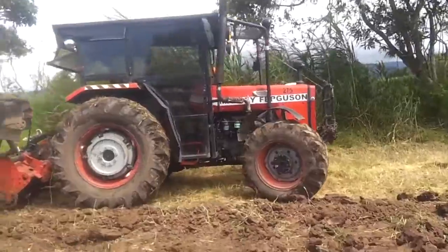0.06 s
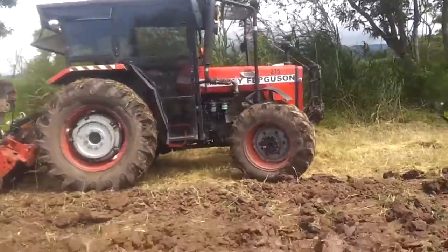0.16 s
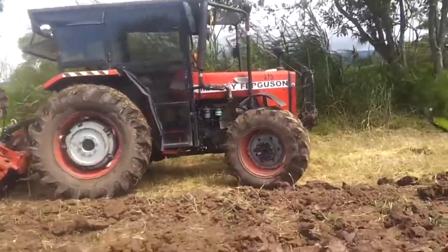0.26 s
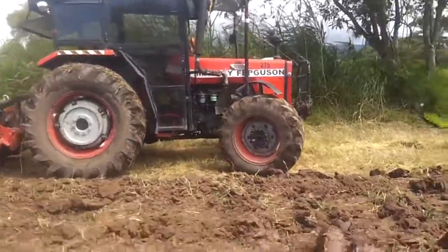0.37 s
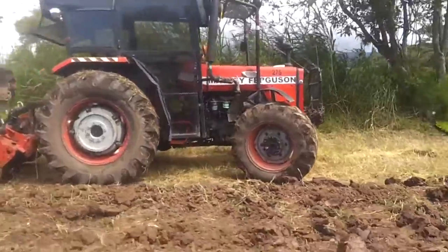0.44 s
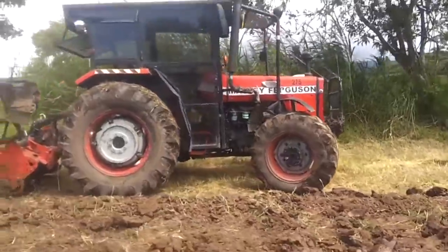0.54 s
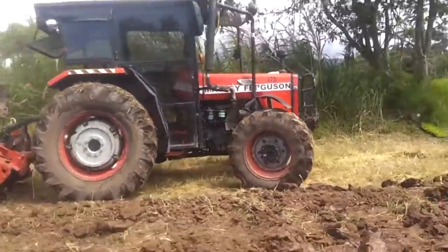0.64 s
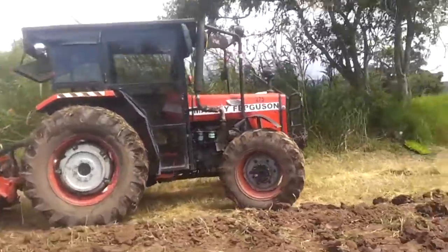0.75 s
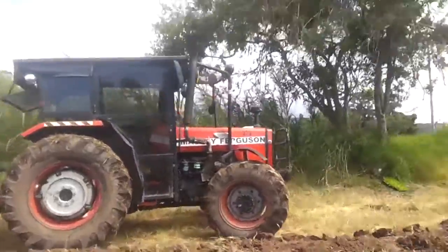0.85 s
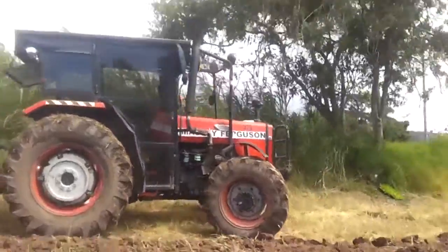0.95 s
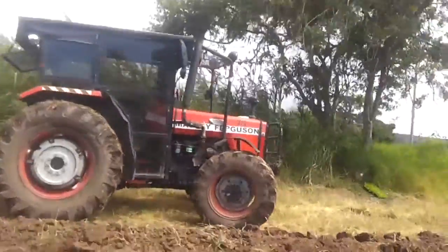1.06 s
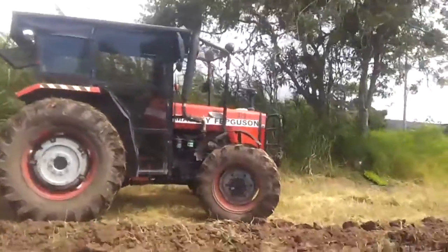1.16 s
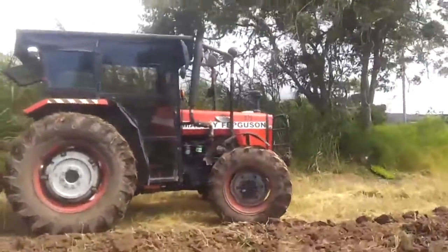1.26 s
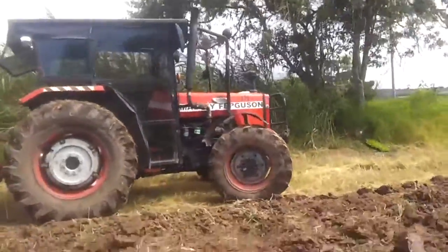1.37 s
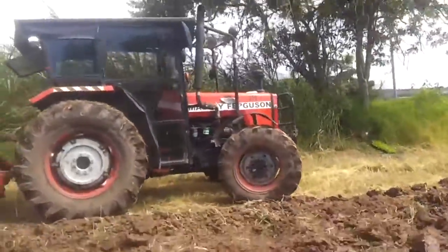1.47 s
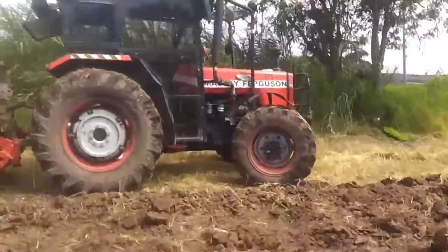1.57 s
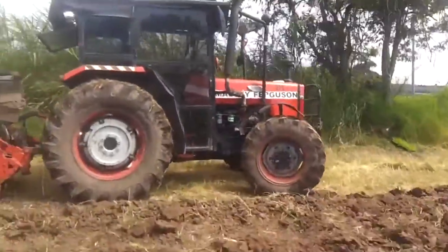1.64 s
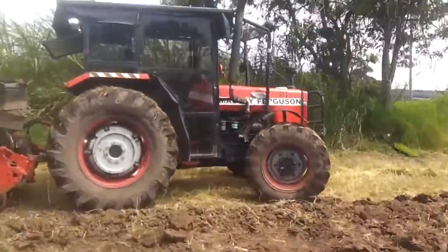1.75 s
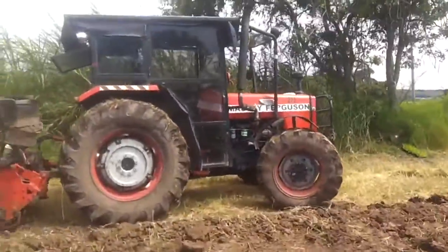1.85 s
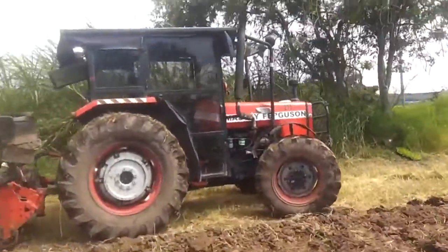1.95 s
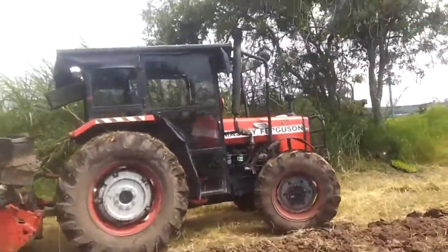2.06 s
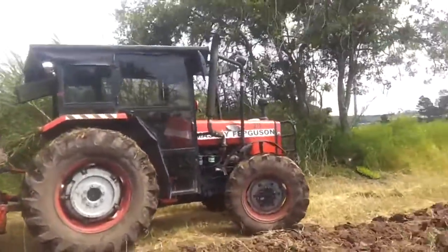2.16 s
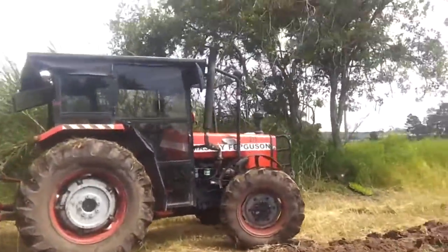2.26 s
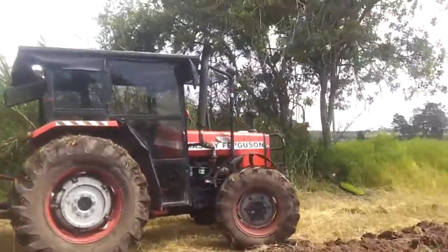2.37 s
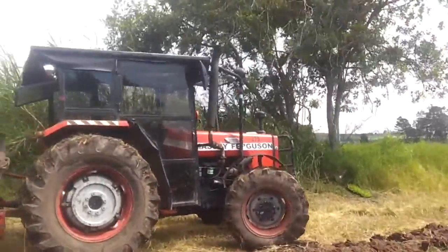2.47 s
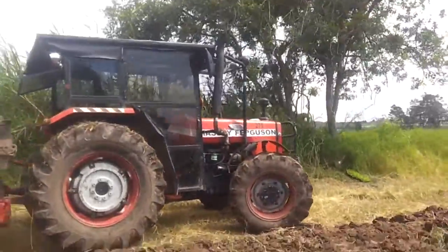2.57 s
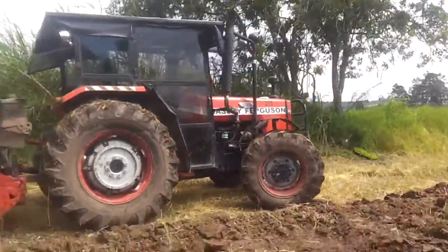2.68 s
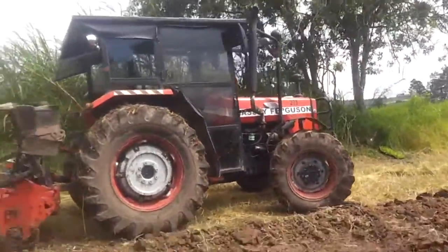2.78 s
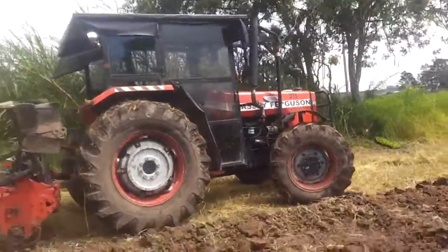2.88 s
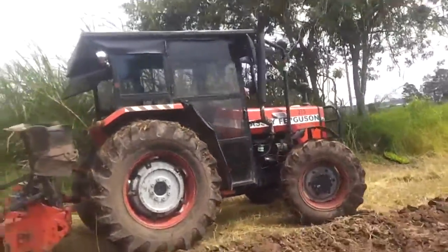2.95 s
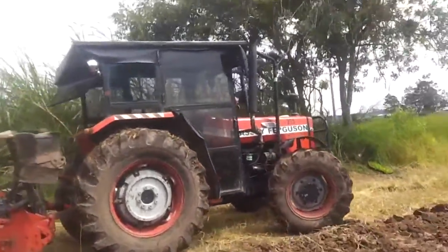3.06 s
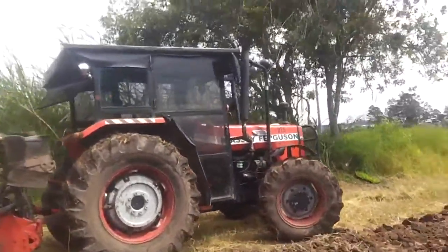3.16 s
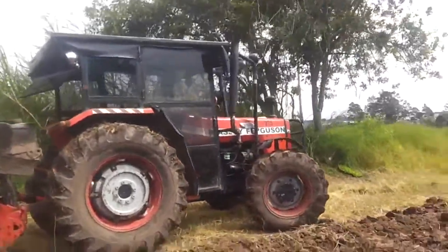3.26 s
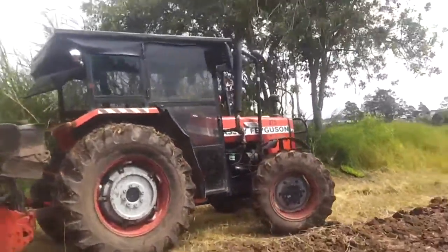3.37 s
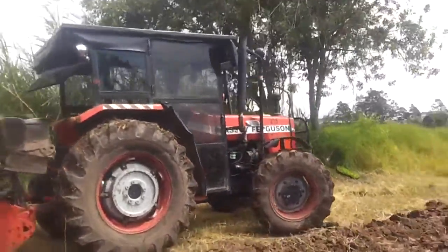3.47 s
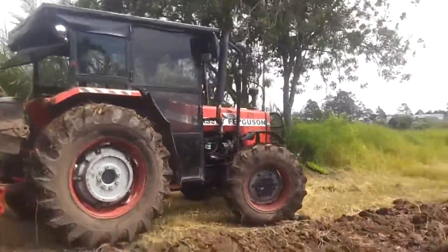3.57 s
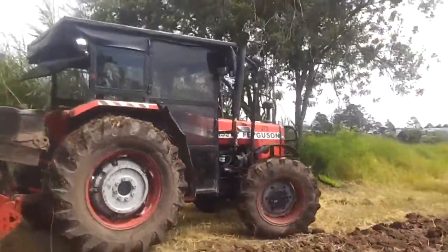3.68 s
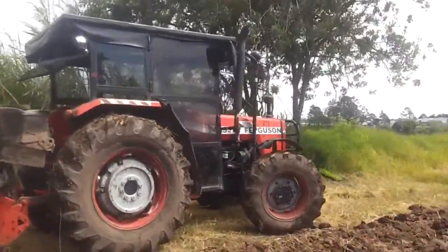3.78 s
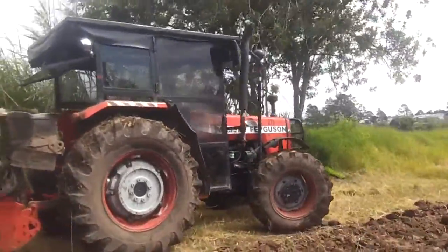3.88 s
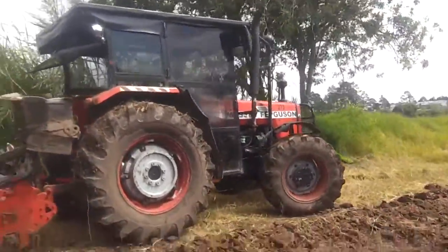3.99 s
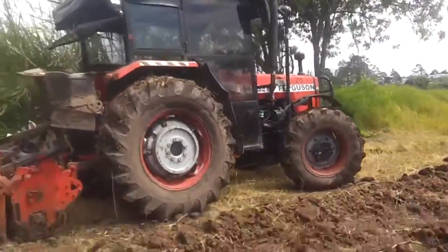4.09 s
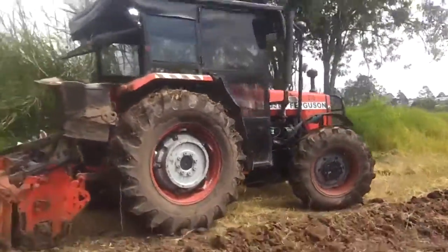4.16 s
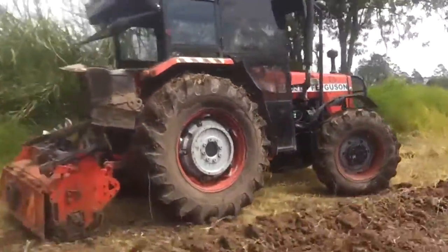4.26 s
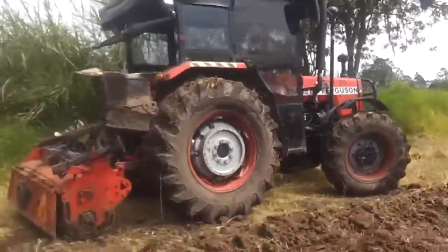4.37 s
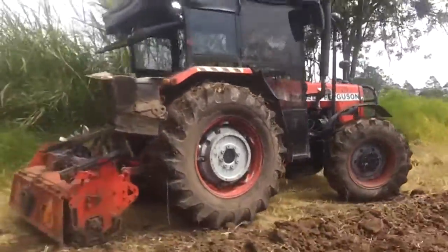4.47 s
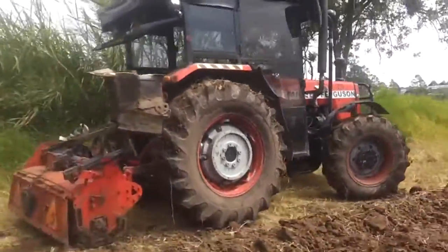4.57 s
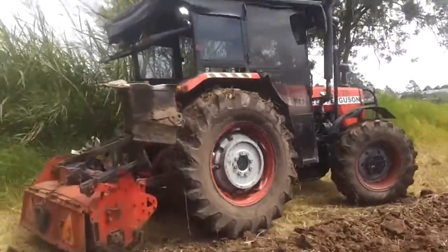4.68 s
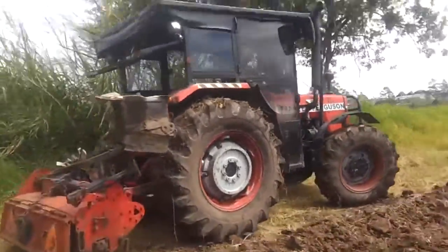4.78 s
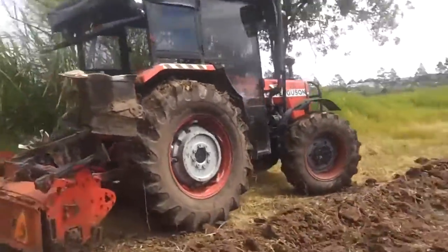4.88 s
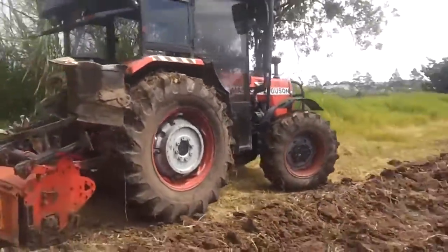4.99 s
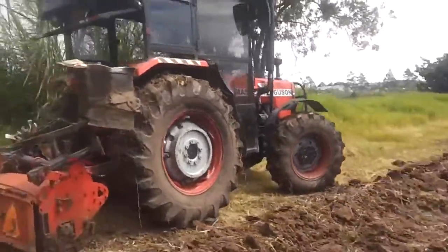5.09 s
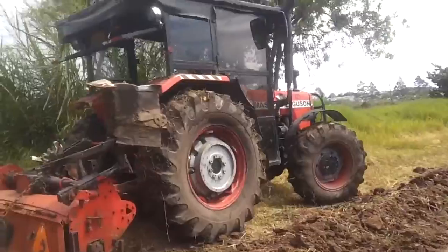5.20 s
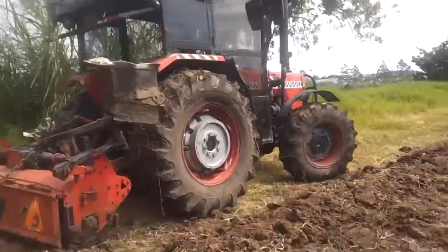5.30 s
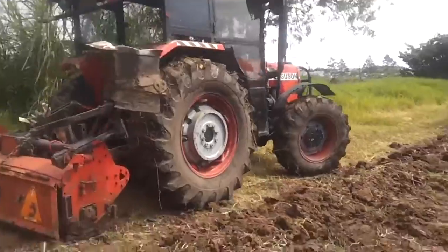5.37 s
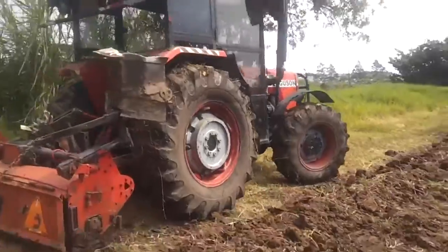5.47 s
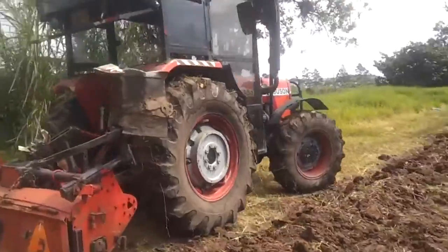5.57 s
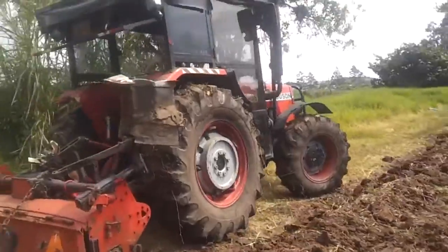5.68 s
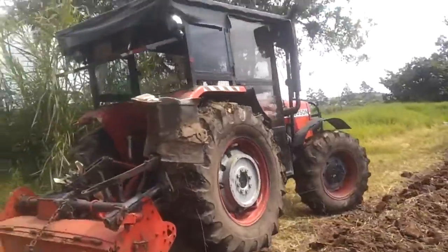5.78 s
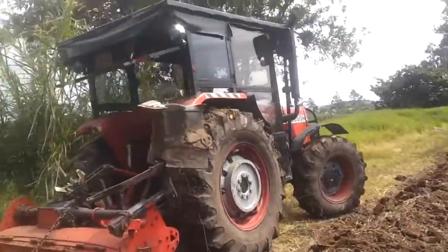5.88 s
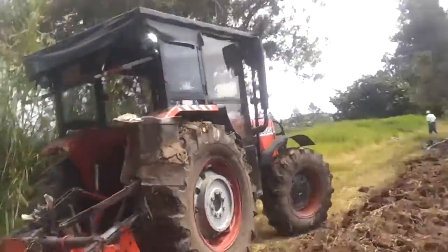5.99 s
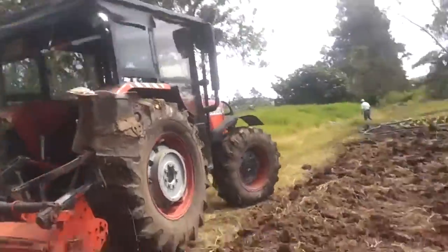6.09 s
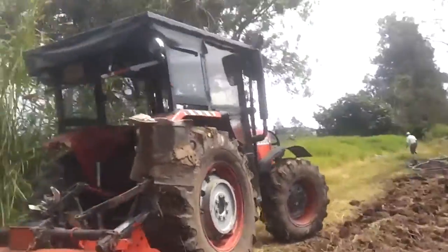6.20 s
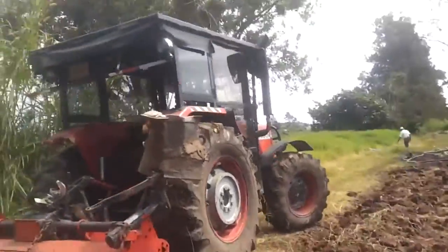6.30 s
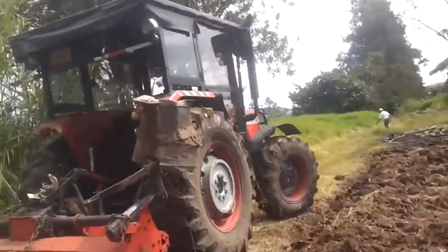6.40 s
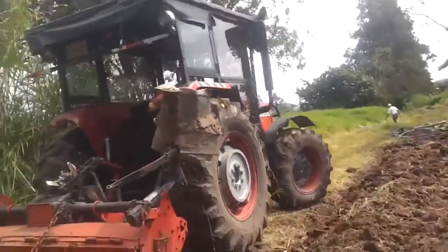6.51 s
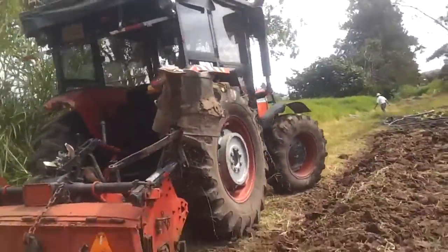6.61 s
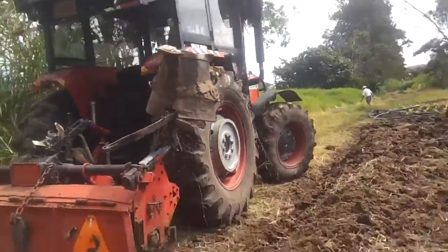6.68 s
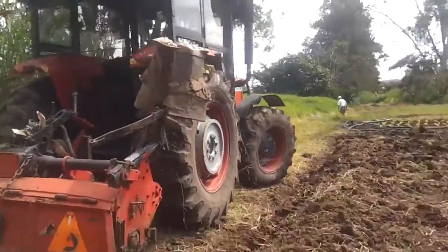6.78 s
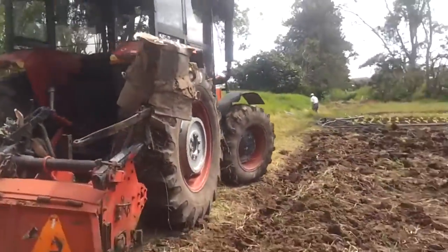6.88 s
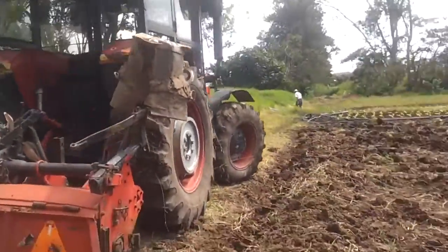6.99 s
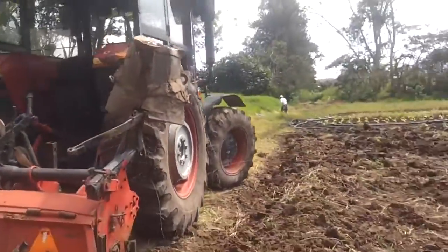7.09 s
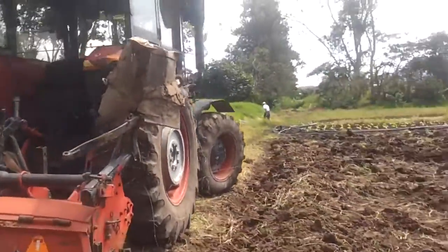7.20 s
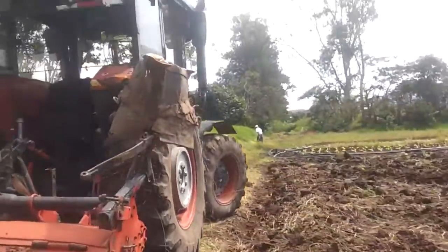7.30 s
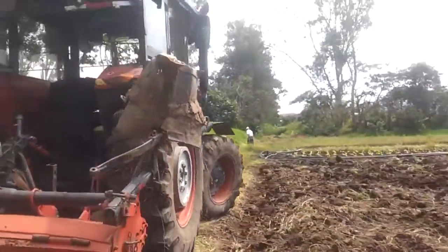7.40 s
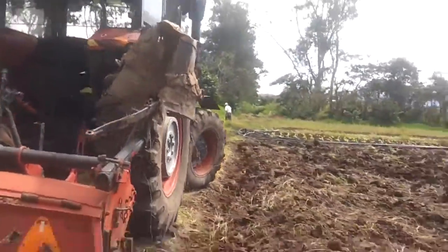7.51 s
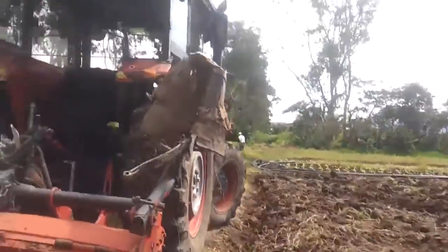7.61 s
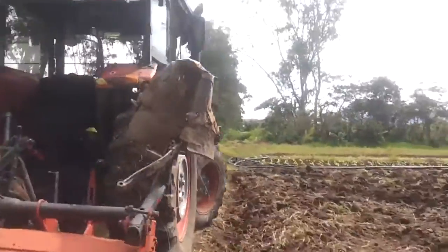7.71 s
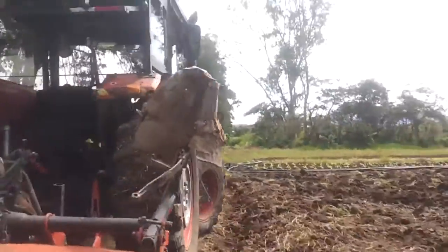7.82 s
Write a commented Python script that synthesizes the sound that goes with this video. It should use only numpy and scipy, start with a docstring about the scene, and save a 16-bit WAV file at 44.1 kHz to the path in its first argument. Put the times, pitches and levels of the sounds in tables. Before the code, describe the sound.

A diesel tractor chugs steadily past, first half buried under crackling wind buffets on the left, later clear, clattering and metallic from behind.

```python
"""Gusts first buffet the two microphone ports of a hand-held phone separately, the left one hardest, and
overload the input; each port sums shaped noise and short pressure swings. Throughout, a diesel tractor chugs
slowly past at about nineteen firings a second, dragging a rotary tiller: noise pulsed by the firing cycle
excites block, sheet metal and exhaust, and fan and soil hiss. As the gusts die away the tractor is heard
more from behind, and a tinny panel there, ringing on every second firing, comes forward."""
import sys
import numpy as np
from scipy import signal
from scipy.fft import rfft, irfft, next_fast_len
from scipy.io import wavfile
from scipy.ndimage import uniform_filter1d, map_coordinates

SR = 44100
rng = np.random.default_rng(int(sys.argv[2]) if len(sys.argv) > 2 else 0)


def field_ratio(decibels):
    """Amplitude ratio for a level in dB (20 dB per decade); scalars and array-likes work."""
    return 10 ** (np.asarray(decibels, dtype=float) / 20)


def wrap_up_sound(samples):
    """Save the sound to the file named by the first command line argument, as 16-bit audio."""
    columns = np.atleast_2d(samples).T
    # keep every value between -1 and 1, then stretch to whole-number steps
    tamed = np.clip(columns, -1, 1)
    steps = np.round(tamed * 32767).astype(np.int16)
    wavfile.write(sys.argv[1], SR, steps)


N = 346185  # length in samples

# Spectrum levels are relative: each coloured noise is later scaled to rms 1.
# level difference of the ports: f/Hz, left over right level/dB
PORT_BALANCE = [(300, -0.5), (500, 2), (750, 0.5), (1050, -6.5), (1300, -10), (1650, -4), (2000, 7),
                (2600, -4.5), (6000, 1.5), (9200, -4), (14000, -16.5)]
# likeness of the two ports: f/Hz, likeness [0-1]
PORT_LIKENESS = [(60, .8), (300, .95), (620, .8), (1100, .55), (2000, .62), (3000, .62), (6400, .3),
                 (12000, .05)]
# phase shift by the port cavities: f/Hz, left leads by [rad]
PORT_LEAD = [(400, 0.18), (900, -1.57), (1400, -1.58), (2000, -0.8), (4000, -0.49)]

# breeze: t/s, left port level/dB, right port level/dB
BREEZE_LEVEL = [(0, -14.5, -46), (.4, -22, -28), (1.8, -25.5, -34), (2.2, -27, -27.5), (3.2, -22, -38),
                (3.45, -33, -37.5), (4.6, -30.5, -31.5), (5.2, -45.5, -47), (7.85, -78, -85)]
# gusts, added to the breeze as power: t/s at the height, port [0 left, 1 right], level/dB, half length [s]
GUST_EVENTS = [(0.124, 0, -10.5, 0.045), (0.343, 0, -9.5, 0.072), (0.535, 0, -11, 0.068),
               (0.798, 0, -19, 0.06), (0.985, 0, -21, 0.015), (1.13, 0, -33, 0.026), (1.238, 0, -2, 0.11),
               (1.567, 0, -15, 0.093), (1.68, 0, -14.5, 0.087), (1.953, 0, -26.5, 0.054),
               (2.325, 0, -18.5, 0.062), (2.55, 0, -15, 0.12), (2.876, 0, -17.5, 0.085),
               (3.043, 0, -32, 0.046), (3.2, 0, -20.5, 0.12), (3.564, 0, -15.5, 0.025),
               (3.702, 0, -15.5, 0.1), (3.906, 0, -12, 0.04), (4.07, 0, -19, 0.017), (4.196, 0, -23, 0.047),
               (4.342, 0, -23.5, 0.054), (4.55, 0, -29.5, 0.044), (4.812, 0, -26.5, 0.048),
               (4.996, 0, -30, 0.054), (.14, 1, -31, .04), (.45, 1, -17, 0.043), (0.637, 1, -14.5, 0.037),
               (0.75, 1, -17, 0.044), (.91, 1, -25, 0.036), (1.1, 1, -35, 0.036), (1.333, 1, -18, 0.083),
               (1.62, 1, -29, 0.031), (2.175, 1, -33, 0.077), (2.68, 1, -24, 0.15), (3.21, 1, -27, .05),
               (3.56, 1, -29, 0.073), (3.856, 1, -23, 0.12), (3.993, 1, -30, 0.059), (4.233, 1, -17, 0.05),
               (4.512, 1, -26, 0.025)]
# strongest eddies: t/s, port [0 left, 1 right], peak level/dB before tearing, f/Hz, length [cycles]
STRONG_EDDIES = [(0.02, 0, 0, 434, 0.37), (0.106, 0, 2, 490, 2), (0.12, 0, 7.5, 730, 0.45),
                 (0.127, 0, 3, 450, .5), (0.168, 0, -9, 400, 0.76), (0.179, 0, -9, 350, .4),
                 (0.205, 0, -9, 377, 0.63), (0.271, 0, -4, 410, 0.26), (0.301, 0, 4, 279, 0.3),
                 (0.324, 0, -4.5, 520, 0.18), (0.344, 0, 7, 350, 0.4), (0.362, 0, -5, 485, 0.31),
                 (0.381, 0, 3, 505, 0.17), (0.425, 0, -6, 450, 0.41), (0.44, 1, -8, 351, 0.54),
                 (0.462, 1, -12, 350, 0.81), (0.5, 0, -13, 476, 0.68), (0.514, 0, -7.5, 352, 0.75),
                 (0.547, 0, 5.5, 480, 0.76), (0.606, 0, -1, 380, 1.4), (0.615, 0, 5, 350, 0.28),
                 (0.652, 1, -11, 395, 0.71), (0.713, 0, -4.5, 377, 0.46), (0.727, 0, -7, 390, 1.5),
                 (0.749, 1, -8, 298, 0.45), (0.812, 0, -14, 380, .4), (0.832, 0, -8, 394, 0.76),
                 (1.118, 0, -7.5, 340, 1.1), (1.142, 0, 0, 374, 1.7), (1.167, 0, -12, 420, 0.45),
                 (1.191, 0, 14, 527, 0.94), (1.199, 0, 4.5, 332, 1.8), (1.2, 0, -16, 70, .5),
                 (1.228, 0, 2, 450, 0.62), (1.238, 0, 0, 420, 0.99), (1.253, 0, 14.5, 563, 1.65),
                 (1.273, 0, -1, 440, 0.55), (1.316, 0, 5, 890, 0.25), (1.326, 0, 10.5, 1190, 0.38),
                 (1.353, 0, 0.5, 396, 0.72), (1.404, 0, -0.5, 326, 0.58), (1.455, 0, 5, 252, 0.24),
                 (1.477, 0, 0, 580, 0.89), (1.492, 0, -2, 480, 0.3), (1.561, 0, -4.5, 430, 1.4),
                 (1.653, 0, 4.5, 426, 0.35), (1.666, 0, -5, 520, .4), (1.694, 0, -8.5, 350, 0.61),
                 (1.732, 0, -6.5, 384, 0.51), (1.77, 0, -11, 300, 0.83), (1.933, 1, -7.5, 342, 0.36),
                 (2.357, 0, -12, 345, 0.67), (2.41, 0, -10, 346, 0.78), (2.431, 0, -8, 286, 0.43),
                 (2.527, 0, -7, 480, 0.41), (2.573, 0, -4.5, 480, 0.44), (2.606, 0, -9, 520, .3),
                 (2.649, 0, -9, 327, 0.35), (2.71, 0, -12.5, 328, 0.4), (2.729, 0, -4.5, 435, 0.41),
                 (2.84, 0, -14, 348, 0.44), (2.87, 0, -4, 300, 0.47), (2.902, 0, -5.5, 414, 0.58),
                 (2.991, 0, -9.5, 294, 1.2), (3.025, 0, -8, 325, 0.38), (3.059, 0, -5.5, 280, 0.4),
                 (3.256, 0, -8, 313, 0.66), (3.428, 1, -4.5, 382, 0.52), (3.564, 0, -11.5, 378, 0.98),
                 (3.641, 0, -7.5, 400, 0.27), (3.669, 0, -11, 350, .3), (3.696, 0, -7.5, 360, 0.4),
                 (3.724, 1, -10, 320, 0.41), (3.736, 0, -10, 300, 0.44), (3.756, 0, -15, 380, .3),
                 (3.809, 0, -5, 424, 0.36), (3.906, 1, -10, 385, 0.48), (3.922, 0, 5, 490, 0.26),
                 (4.194, 0, -5, 330, 0.41), (4.224, 1, -1.5, 290, 0.99), (4.274, 1, -8.5, 347, 0.36),
                 (4.357, 1, -13.5, 298, .8), (4.496, 1, -10.5, 237, 0.58), (4.889, 0, -0.5, 457, 0.38)]
# spectrum of the buffeting: f/Hz, level/dB per Hz
BUFFET_SPECTRUM = [(15, -78), (40, -54), (100, -4), (200, 4.5), (300, 2.5), (450, -15), (700, -24.5),
                   (1500, -36), (4000, -84)]
# spectrum of big slow eddies: f/Hz, level/dB per Hz
THUD_SPECTRUM = [(15, -28), (40, -29), (90, 18), (160, 8), (300, -54)]
# spectrum of fine turbulence: f/Hz, level/dB per Hz
RASP_SPECTRUM = [(250, 6), (550, 16.5), (1000, 6), (2000, -6), (4000, -30.5)]

# running of the engine: t/s, firings so far
FIRING_COUNT = [(0.0, -0.13), (4.0, 74.93), (5.8, 108.62), (7.0, 131.02), (7.85, 147.11)]
# the tractor creeps past: t/s, engine level/dB, seen from behind [0-1], left port hears later by [ms]
PASSAGE = [(0, -42.5, 0.3, 0.03), (.25, -36, 0.22, 0.027), (.65, -40, 0.2, -0.0011), (.8, -36, 0.45, 0.023),
           (1.07, -36, 0.33, 0.03), (1.65, -38, 0.4, 0.0068), (1.95, -36, 0.5, -0.048),
           (2.2, -38.5, 0.3, 0.00047), (2.4, -36, 0.4, 0.009), (3.3, -36.5, 0.67, -0.0056),
           (3.72, -37.5, 0.2, 0.025), (3.95, -36, 0.3, -0.059), (4.7, -38, 1, -0.091),
           (4.87, -40.5, 0.5, -0.078), (5.23, -36.5, 1, -0.046), (5.5, -38.5, 0.9, -0.079),
           (6.4, -38.5, 0.85, 0.034), (7.2, -38, 1, 0.016), (7.85, -37.5, 0.77, 0.053)]
# how much the tinny rear panel faces the phone: t/s, level/dB over the engine level
PANEL_FACING = [(0, -16), (4.3, -16), (4.6, -11), (5.3, -7), (6.2, -8), (6.8, -12), (7.15, -2), (7.85, -2)]
# resonances of block and sheet metal: f/Hz, width [Hz], level/dB over the rest from the side, and from behind
METAL_MODES = [(1033, 37, 4.5, 5), (1463, 16, -3, 9), (1660, 26, -15, 5), (2140, 170, 6.5, -1.5),
               (2866, 41, 7.5, 3), (4300, 47, -21, 7.5)]
# spectrum of the valve gear: f/Hz, level/dB per Hz
CLATTER_SPECTRUM = [(1200, -1), (2200, -8), (3200, 1), (5000, 2.5), (7000, 1.5), (9000, -3), (11000, -24),
                    (14400, -49)]
# spectrum of the shaken block: f/Hz, level/dB per Hz
KNOCK_SPECTRUM = [(400, -7), (620, -2.5), (800, 3), (1300, -2), (2000, 1), (2600, -5), (4500, -22)]
# spectrum of the exhaust: f/Hz, level/dB per Hz
EXHAUST_SPECTRUM = [(20, -70), (40, -45), (75, -16), (130, -15), (250, -4.5), (300, -2), (355, 1),
                    (420, -3.5), (500, -9.5), (620, -6), (1000, -54)]
# spectrum of fan and thrown soil: f/Hz, level/dB per Hz
HISS_SPECTRUM = [(2000, 7), (4000, 6), (8000, 7), (10500, 5.5), (12500, -7.5), (14400, -18)]
# spectrum of the tinny rear panel: f/Hz, level/dB per Hz
TINNY_SPECTRUM = [(600, -40), (950, -14), (1020, 2), (1100, 2), (1180, -14), (1700, -26), (3800, -44),
                  (4280, -28), (4800, -44)]


def unit(x):
    """Normalisation to an rms of 1."""
    return x / np.sqrt(np.mean(x ** 2) + 1e-20)


def along(points, hz):
    """Linear interpolation of (f/Hz, value) points on a logarithmic frequency axis."""
    f, value = np.transpose(points)
    return np.interp(np.log(hz + 1), np.log(f + 1), value)


def curves(rows):
    """Linear interpolation in time: one curve for each column after t/s."""
    s, *columns = np.transpose(rows)
    return np.array([np.interp(np.arange(N) / SR, s, column) for column in columns])


def wobble(rate):
    """Slow random fluctuation: a spline through independent normal knots, rate knots a second."""
    knots = rng.standard_normal(int(N * rate / SR) + 4)
    return map_coordinates(knots, [np.arange(N) * rate / SR])


def filtered(x, response):
    """Linear filtering: the spectrum of x times a response of f/Hz."""
    m = next_fast_len(N + 8192)
    return irfft(rfft(x, m) * response(np.fft.rfftfreq(m, 1 / SR)), m)[..., :N]


def patchy(patchy_db):
    """Modulated noise: two independent noises share random gain patches in time and frequency."""
    z = signal.stft(rng.standard_normal((2, N)), nperseg=512)[2]
    field = rng.standard_normal(z.shape[1:])
    field = uniform_filter1d(field, size=5, axis=0)  # across frequency
    field = uniform_filter1d(field, size=6, axis=1)  # along time, about 35 ms
    return signal.istft(z * field_ratio(patchy_db * unit(field)), nperseg=512)[1][:, :N]


def at_ports(pair, spectrum):
    """Partial coherence: two coloured signals mix as mid and side into both ports, rms 1."""
    def colour(hz):
        turn = np.arccos(np.clip(along(PORT_LIKENESS, hz), 0, 1)) / 2
        return field_ratio(along(spectrum, hz)) * [np.cos(turn), np.sin(turn)]

    def port_response(hz):
        left_over_right = field_ratio(along(PORT_BALANCE, hz)) * np.exp(1j * along(PORT_LEAD, hz))
        return left_over_right ** [[.5], [-.5]]

    mid, side = filtered(pair, colour)
    return unit(filtered(np.array([mid + side, mid - side]), port_response))


def airflow(port):
    """Superposition of powers: the breeze plus bell-shaped gusts at one port, as a level in dB."""
    t = np.arange(N) / SR
    power = field_ratio(2 * curves(BREEZE_LEVEL)[port])
    for s, at, db, half in GUST_EVENTS:
        if round(at) == port:
            near = slice(max(int((s - 4 * half) * SR), 0), int((s + 4 * half) * SR))
            power[near] += field_ratio(2 * db) * np.exp(-2 * ((t[near] - s) / half) ** 2)
    return 10 * np.log10(power)


def eddies(s, db, hz, cycles):
    """Vortex pressure: short swings under a Gaussian envelope, mostly pushing inward, centred at s."""
    t = np.arange(-400, 400) / SR
    turns = hz[:, None] * t
    shift, glide = rng.random((2, len(s), 1)) - .5
    phase = turns + 0.43 * shift + 0.15 * glide * turns ** 2  # in cycles
    envelope = np.exp(-(turns / np.reshape(cycles, (-1, 1))) ** 2)
    swing = np.cos(2 * np.pi * phase) * envelope
    at = np.clip(np.round(s[:, None] * SR) + np.round(t * SR), 0, N).astype(int)
    return np.bincount(at.ravel(), (field_ratio(db)[:, None] * swing).ravel(), N + 1)[:N]


def rush(spectrum, lumps_db):
    """Turbulent noise: lumps of white noise coloured by a spectrum, rms 1."""
    lumpy = field_ratio(lumps_db) * rng.standard_normal(N)
    return unit(filtered(lumpy, lambda hz: field_ratio(along(spectrum, hz))))


def wind_at(port):
    """Turbulent pressure at one port: stronger flow raises the pitch of its eddies and adds a rasp."""
    level_db = airflow(port)
    flutter = wobble(70)
    buffet = rush(BUFFET_SPECTRUM, 3.3 * wobble(25) + 3.7 * flutter)

    # deep thudding over the flow hardly follows the strongest gusts
    thud_db = (-11, -26)[port] - 0.6 * np.maximum(level_db + 33.5, 0)
    thud = field_ratio(thud_db) * rush(THUD_SPECTRUM, 3 * wobble(17))
    rasp = field_ratio(1.05 * (level_db + 17.5)) * rush(RASP_SPECTRUM, 5 * wobble(45) + 5 * flutter)

    # a swarm of a thousand random eddies, few of them large
    when, size, pitch = rng.random((1000, 3)).T
    s = when * N / SR
    flow_db = level_db[(s * SR).astype(int)]
    hz = 270 * field_ratio(0.16 * (flow_db + 19) + 7 * (pitch - .5))
    swarm = unit(eddies(s, -3.5 * np.log(size + .05), hz, cycles=.48))

    flow = .6 * buffet + thud + .12 * rasp + .7 * swarm
    table = np.array(STRONG_EDDIES)
    s, _, db, hz, cycles = table[np.round(table[:, 1]) == port].T
    torn = 1 + 0.32 * rush(RASP_SPECTRUM, 3 * flutter)  # by finer turbulence
    return field_ratio(level_db) * flow + eddies(s, db, hz, cycles) * torn


def wind():
    """Local flow noise: the turbulence at each port is independent of the other."""
    return np.array([wind_at(port) for port in (0, 1)])


def beat(lead, rise, fall, scatter_db, between_db, every=1):
    """Periodic excitation: quick rise, slower fall [in cycles], random strength, over a steady floor."""
    count = (curves(FIRING_COUNT)[0] + lead + 1) / every
    part = count % 1
    size = field_ratio(scatter_db * rng.standard_normal(int(count.max()) + 1))[count.astype(int)]
    burst = (1 - np.exp(-part / rise)) * np.exp(-(part / fall) ** 2)
    return size * burst + field_ratio(between_db)


def fan_and_soil():
    """Broadband flow noise: fan and tiller hiss, nearly steady over the firing cycle."""
    pulse = beat(lead=0.95, rise=0.021, fall=0.3, scatter_db=15.0, between_db=32.0)
    return at_ports(pulse * patchy(patchy_db=2.5), HISS_SPECTRUM)


def exhaust_puffs():
    """Pulsed outflow: one steady puff per firing, as a train of impulses, with the running count."""
    count = curves(FIRING_COUNT)[0] + 0.2163
    return unit(np.diff(np.floor(count), prepend=np.floor(count[0]))), count


def exhaust_pipe(puffs):
    """Pulsed outflow with turbulence: puffs and pulsing gas noise share one spectrum."""
    pulse = beat(lead=.27, rise=.04, fall=.35, scatter_db=2, between_db=-3)
    gas = unit(pulse * patchy(patchy_db=2.1))
    return at_ports(gas + [[.45], [0]] * puffs, EXHAUST_SPECTRUM)


def tinny_panel(puffs, count):
    """Forced vibration: a rear panel rings on every second firing, as rattle and sharp strikes."""
    pulse = beat(lead=1.36, rise=.04, fall=.22, scatter_db=1, between_db=-20, every=2)
    rattle = unit(pulse * patchy(patchy_db=1))
    second = puffs * (np.floor(count) % 2 == 0)
    strikes = unit(np.roll(second, round(.008 * SR)))  # the ring peaks a little after the firing
    return at_ports(rattle + [[.8], [.4]] * strikes, TINNY_SPECTRUM)


def valve_gear():
    """Impact noise: each firing shakes the valve gear into a bright clatter."""
    pulse = beat(lead=.27, rise=.045, fall=.42, scatter_db=1.7, between_db=-8)
    return at_ports(pulse * patchy(patchy_db=1.6), CLATTER_SPECTRUM)


def engine_block():
    """Combustion noise: each firing shakes the block into a lower knock."""
    pulse = beat(lead=0.23, rise=0.11, fall=0.5, scatter_db=1.3, between_db=-7.5)
    return at_ports(pulse * patchy(patchy_db=2), KNOCK_SPECTRUM)


def metal_ring(f):
    """Modal resonance: the response of block and sheet metal from the side and from behind."""
    response = 1
    for centre, width, side, rear in METAL_MODES:
        resonance = 1j * f * width / (centre * centre - f * f + 1j * f * width)
        response = response + (field_ratio([[[side]], [[rear]]]) - 1) * resonance
    return response


def tractor():
    """Superposition of sources: each part's level follows the passage and the side it is heard from."""
    engine_db, behind, late_ms = curves(PASSAGE)
    knock_db = engine_db + .5 * wobble(7)  # dB, knots a second: the load wavers as the tines bite

    def part_db(side, rear):  # dB over the engine level
        return knock_db + side + (rear - side) * behind

    clatter_db, hiss_db, exhaust_db = part_db(-1.5, -7), part_db(-13, -4), part_db(-2.5, -4.5)
    tinny_db = knock_db + curves(PANEL_FACING)[0]

    struck = field_ratio(clatter_db) * valve_gear() + field_ratio(knock_db) * engine_block()
    from_side, from_rear = filtered(struck, metal_ring)
    metal = from_side + np.clip(behind, 0, 1) * (from_rear - from_side)

    puffs, count = exhaust_puffs()
    tinny = field_ratio(tinny_db) * tinny_panel(puffs, count)
    hiss = field_ratio(hiss_db) * fan_and_soil()
    exhaust = field_ratio(exhaust_db) * exhaust_pipe(puffs)
    left, right = metal + tinny + hiss + exhaust
    left = map_coordinates(left, [np.arange(N) - late_ms * SR / 1000], mode="nearest")
    return np.array([left, right])


def scene():
    """Superposition of sound pressures: wind and tractor."""
    return wind() + tractor()


def low_pass(x):
    """Removes everything above the highest recorded frequency."""
    return signal.sosfilt(signal.butter(12, 14570, fs=SR, output="sos"), x)


def record(dry):
    """Gain control and saturation: loud gusts cut a shared gain that recovers steadily; each channel clips."""
    limit_db, squeeze, recover_db_per_s = -15, 0.52, 37  # threshold, share of excess cut, recovery
    dry = filtered(dry, lambda hz: (1j * hz / (45 + 1j * hz)) ** 2)  # the microphone hears no deep bass
    loudest = uniform_filter1d(np.max(dry ** 2, axis=0), size=600)
    loud_db = 10 * np.log10(np.abs(loudest) + 1e-12)
    cut_db = squeeze * np.maximum(loud_db - limit_db, 0)
    ramp = recover_db_per_s * np.arange(N) / SR
    cut_db = np.maximum.accumulate(cut_db + ramp) - ramp
    x = dry * field_ratio(-uniform_filter1d(cut_db, size=600))
    top, hard = .54, 9  # clipping amplitude, sharpness of the knee
    x = x / (1 + np.abs(x / top) ** hard) ** (1 / hard)
    x = filtered(x, lambda hz: hz < 14600)
    return low_pass(x)


dry = scene()
out = record(dry)
wrap_up_sound(out)
```